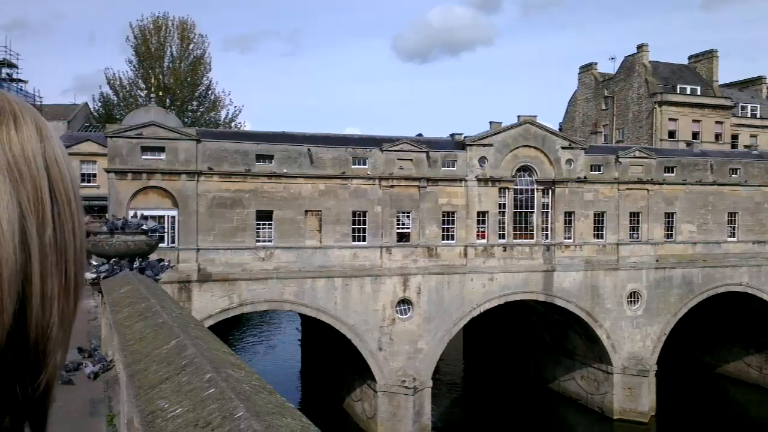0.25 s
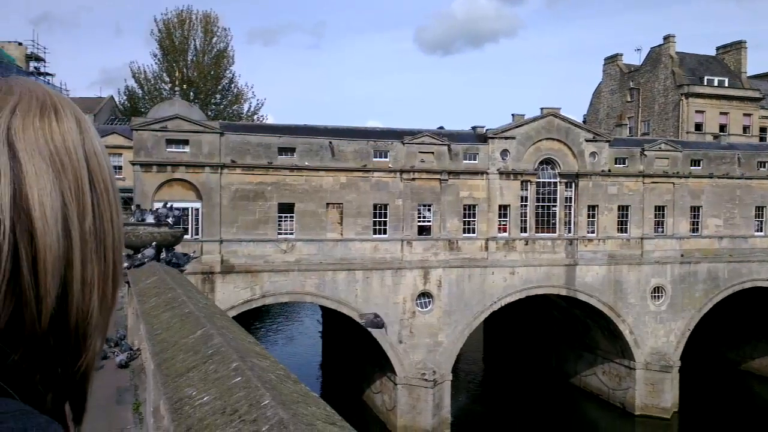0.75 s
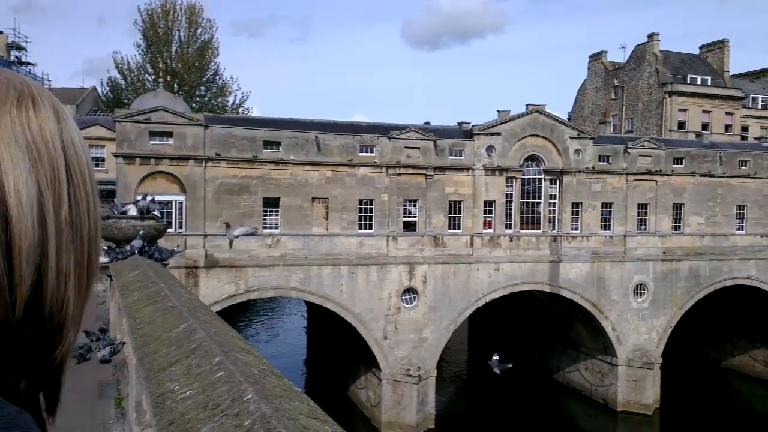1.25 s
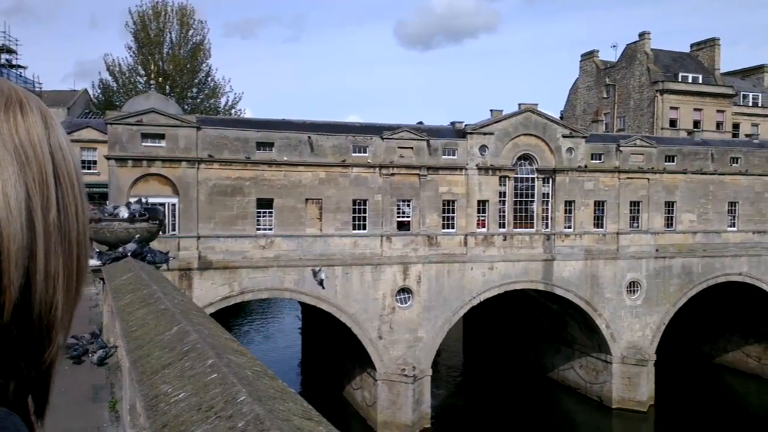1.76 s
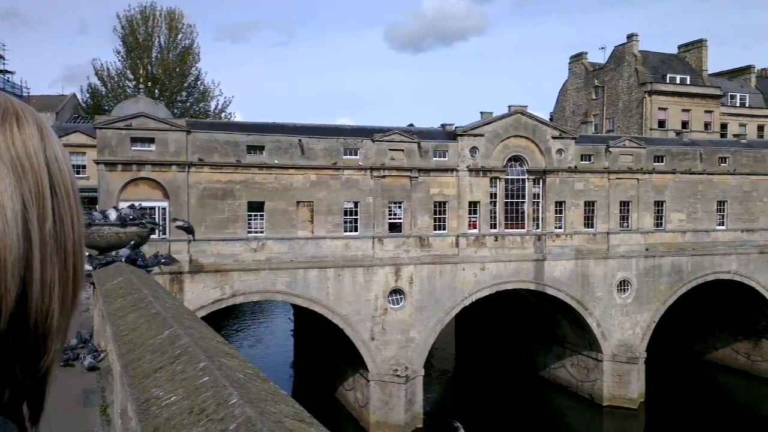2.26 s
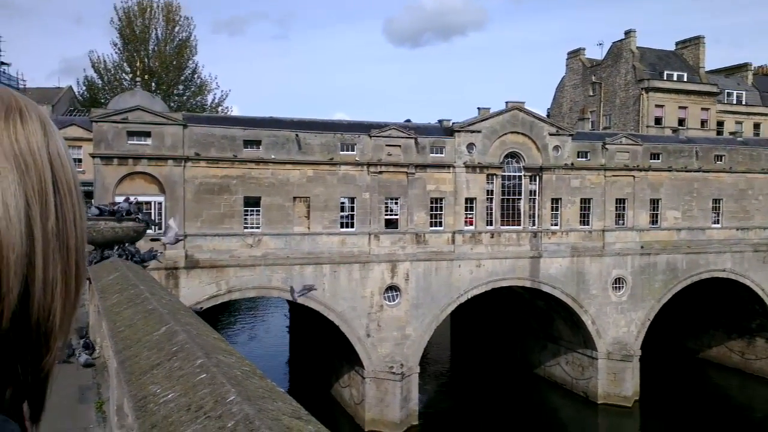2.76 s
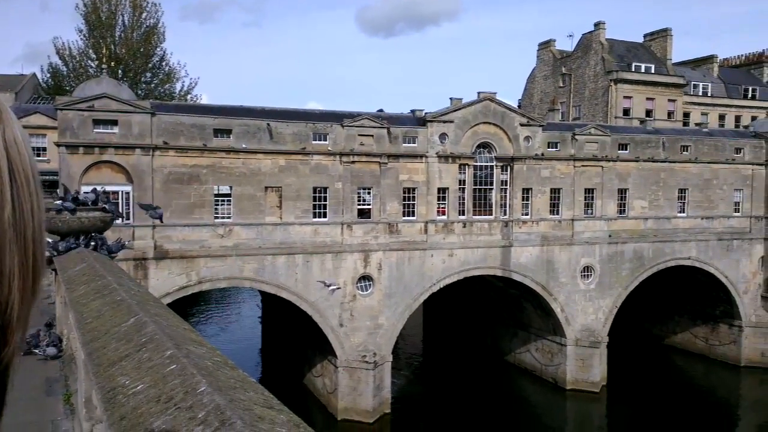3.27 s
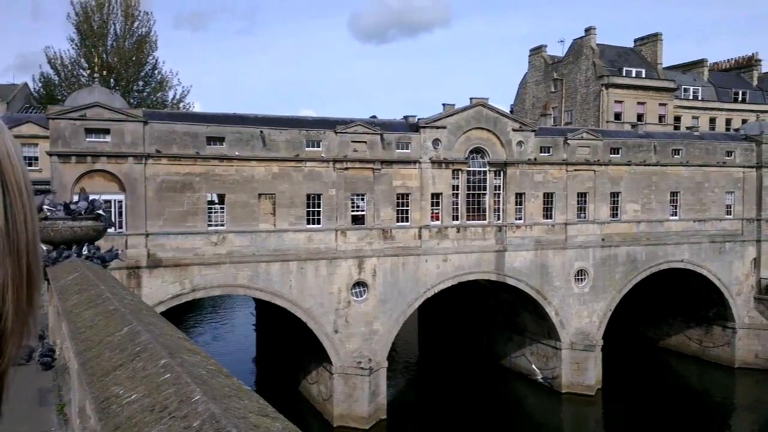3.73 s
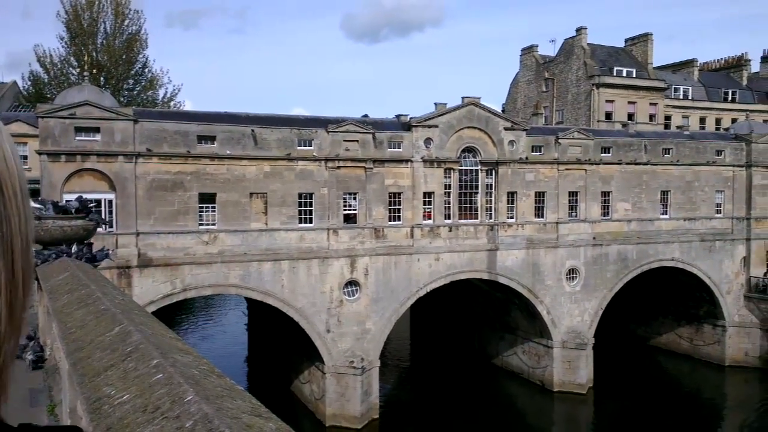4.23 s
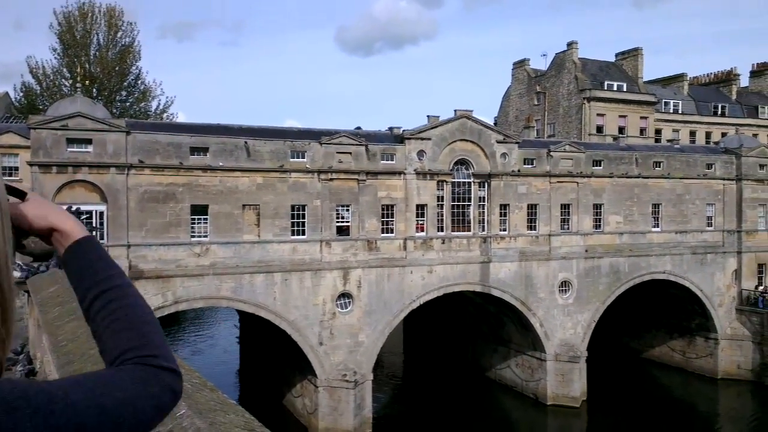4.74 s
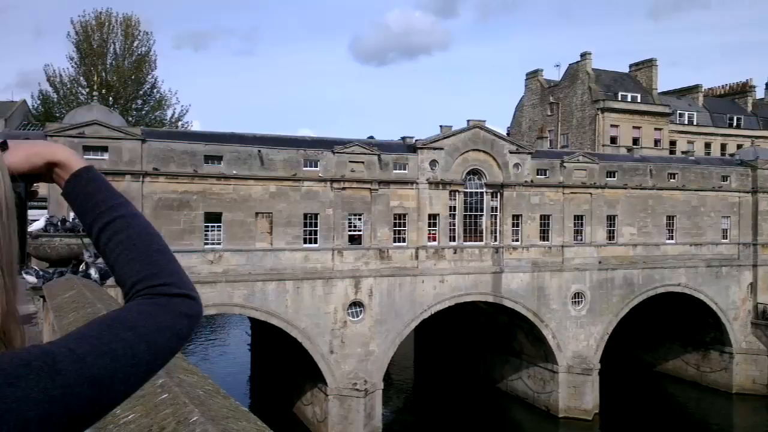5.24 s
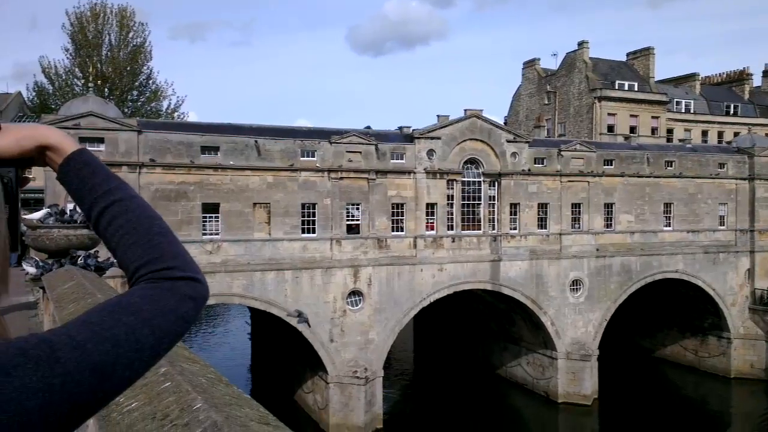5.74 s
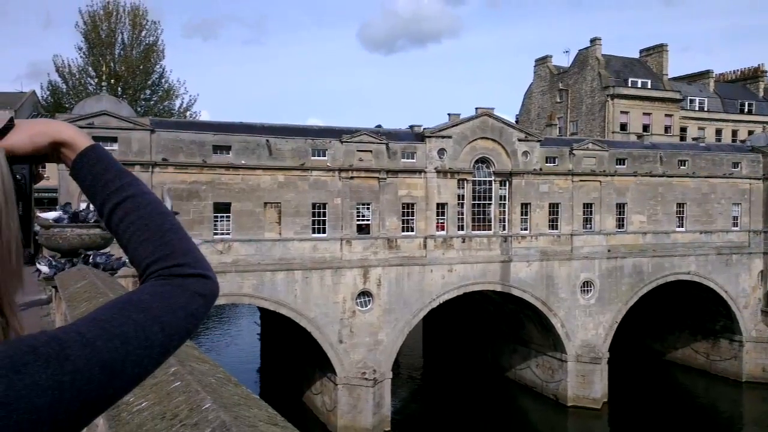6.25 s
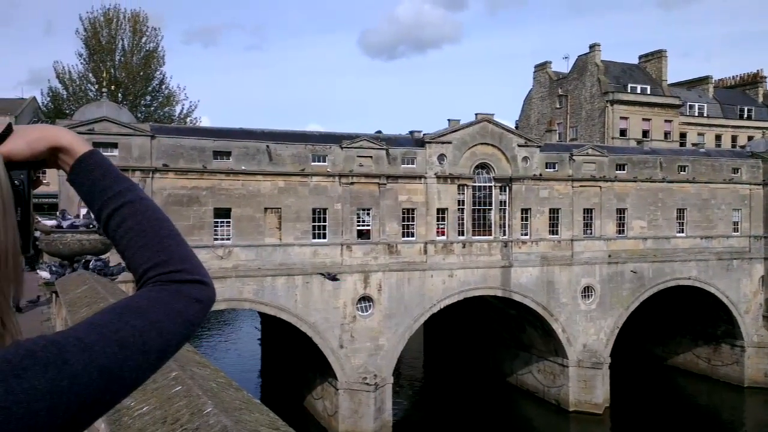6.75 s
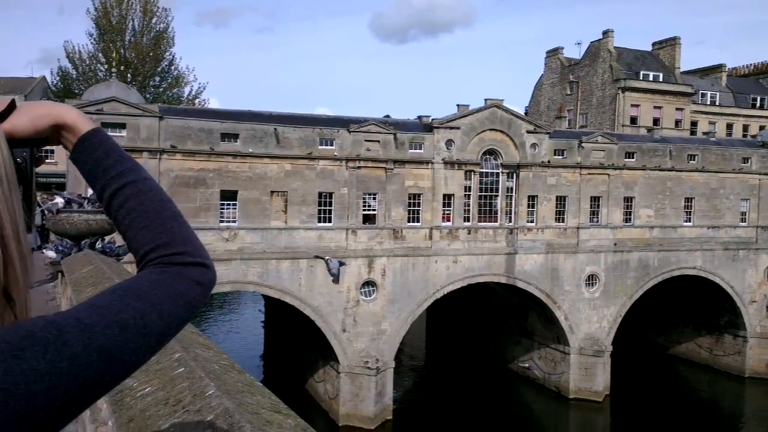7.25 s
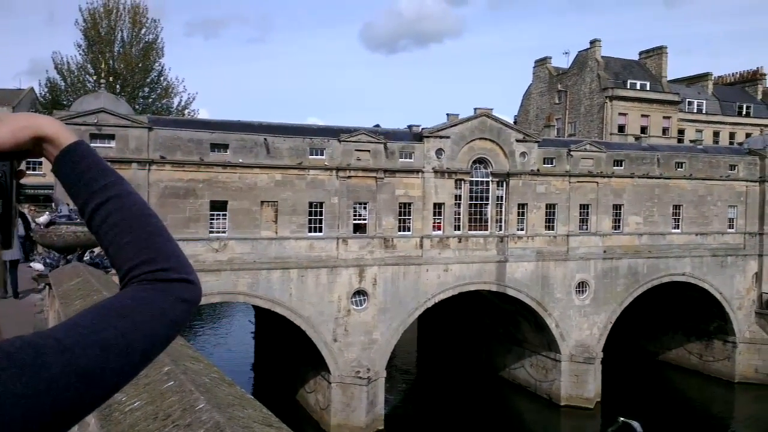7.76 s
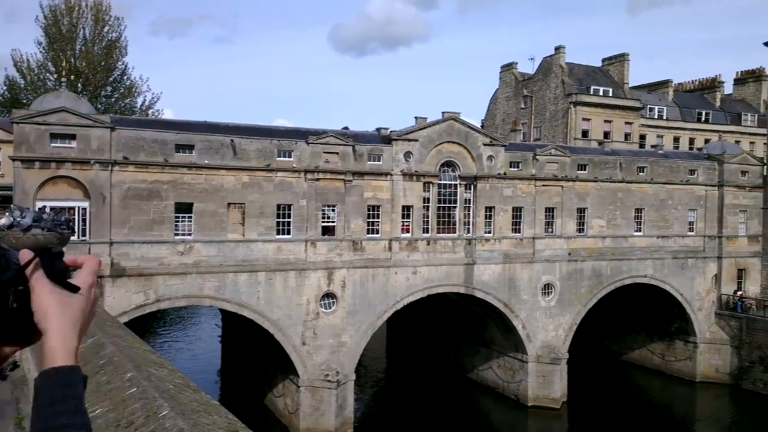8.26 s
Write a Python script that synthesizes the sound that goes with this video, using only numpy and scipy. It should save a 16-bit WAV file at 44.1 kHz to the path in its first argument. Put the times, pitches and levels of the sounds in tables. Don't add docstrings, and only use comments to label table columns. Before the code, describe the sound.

Constant rushing river water outdoors, with thin brake squeals, bursts of air release, dull distant thuds, and later sharp wing claps near the microphone.

```python
import sys
import numpy as np
from scipy import signal
from scipy.fft import rfft, irfft
from scipy.io import wavfile
from scipy.ndimage import uniform_filter1d

SR = 44100
rng = np.random.default_rng(int(sys.argv[2]) if len(sys.argv) > 2 else 0)


def natural_amplitude(level_db):
    exponent = np.asarray(level_db, float) / 20
    return 10 ** exponent


def generate_wav(sig):
    pcm = np.round(np.clip(np.atleast_2d(sig).T, -1, 1) * 32767).astype(np.int16)
    wavfile.write(sys.argv[1], SR, pcm)


N = 374661


def evened(x):
    return x / np.sqrt(np.mean(x ** 2) + 1e-20)


def read(points, hz):
    f, value = np.transpose(points)
    return np.interp(np.log(hz + 1), np.log(f + 1), value)


def add(mix, start_s, sound, pan_db):
    part = mix[:, round(start_s * SR):][:, :sound.shape[-1]]
    part += sound[..., :part.shape[1]] * natural_amplitude([[pan_db / 2], [-pan_db / 2]])


def resonate(x, hz, width_hz):
    return signal.lfilter(*signal.iirpeak(hz, hz / width_hz, SR), x)


def swell(t, start_s, length_s, rise_s, fall_s):
    opening = (t - start_s) / rise_s
    closing = (start_s + length_s - t) / fall_s
    return np.clip(np.minimum(opening, closing), 0, 1)


def drifting(noise, bins, frames):
    return evened(uniform_filter1d(uniform_filter1d(noise, size=bins, axis=0), size=frames, axis=1))


def pair(frames, hz, likeness):
    a, b, c, d = rng.standard_normal((frames, len(hz), 4)).T
    left, other = a + 1j * b, c + 1j * d
    same = likeness[:, None] / np.maximum(abs(likeness[:, None]), 1)
    right = same * left + np.sqrt(abs(1 - abs(same) ** 2)) * other
    return np.array([left, right])


def across(curves, hz):
    layer_hz = [600, 1400, 3000, 7500]
    place = np.interp(np.log(hz + 1), np.log(layer_hz), np.arange(len(curves)))
    share = np.clip(1 - abs(place[:, None] - np.arange(len(curves))), 0, 1)
    return share @ curves


def breeze(level_db=-86, lumpy_db=7):
    air, lumps = rng.standard_normal((2, 2, N))
    lumps = evened(uniform_filter1d(uniform_filter1d(lumps.sum(0), size=1800), size=1800))
    low = resonate(resonate(air * natural_amplitude(lumpy_db * lumps), 117, 110), 120, 200)
    return natural_amplitude(level_db) * evened(low + .5 * low[::-1])


def thud(db, t60_s):
    t = np.arange(int(.15 * SR)) / SR
    boom = evened(resonate(resonate(rng.standard_normal(len(t)), 960, 770), 860, 950))
    return natural_amplitude(db - 60 * t / t60_s) * boom * np.minimum(t / .003, 1)


def squeal(hz, grips, waver, rough, edge_s, drag_db):
    start_s = grips[0][0]
    length_s = sum(grips[-1][:2]) - start_s
    t = np.arange(start_s, start_s + length_s, 1 / SR)
    drift, flutter = uniform_filter1d(rng.standard_normal((SR, 2)), size=300, axis=0).T
    turns = np.cumsum(hz * (1 + waver * evened(drift)[:len(t)])) / SR
    tone = np.sqrt(2) * np.sin(2 * np.pi * turns) * (1 + rough * evened(flutter)[:len(t)])
    drag = (start_s, length_s, drag_db)
    press = [natural_amplitude(db) * swell(t, s, held_s, edge_s, edge_s) for s, held_s, db in grips + [drag]]
    return start_s, tone * np.max(press, axis=0)


def puff(start_s, length_s, db, dull_db_per_khz):
    # (frequency [Hz], density [dB per Hz])
    jet_colour = [(2350, -22), (4000, -3), (4740, -5.5), (7650, -1.5), (9060, 2), (9630, 2), (13800, -22),
                  (14900, -22), (15400, -36)]
    t = np.arange(max(start_s, 0), start_s + length_s, 1 / SR)
    hz = np.fft.rfftfreq(512, 1 / SR)
    frames = len(t) // 128 + 5
    shut = 1 - np.sin(np.linspace(0, np.pi, frames))
    over_khz = np.maximum(hz - 11500, 0) / 1000
    density_db = read(jet_colour, hz)[:, None] - dull_db_per_khz * np.outer(over_khz, 1 + 1.5 * shut)
    z = pair(frames, hz, .3 + 0 * hz) * natural_amplitude(density_db)
    hiss = evened(signal.istft(z, nperseg=512, noverlap=384)[1][:, :len(t)])
    flutter = evened(uniform_filter1d(rng.standard_normal(SR), size=1200))[:len(t)]
    sag_db_per_s, flutter_db = 13.5, 1.1
    pressure = natural_amplitude(db - sag_db_per_s * (t - start_s) + flutter_db * flutter)
    return t[0], hiss * pressure * swell(t, start_s, length_s, rise_s=0.091, fall_s=0.07)


def clap(rustle_s, bright_db_per_octave):
    # (frequency [Hz], width [Hz], level [dB])
    mic_peaks = [(3300, 1500, 1), (5400, 2500, -3), (8700, 2500, -3), (13800, 2500, -19)]
    t = np.arange(2600) / SR
    rustle = t / rustle_s * np.exp(-2 * t / rustle_s)
    echoes = 0.04 * np.exp(-t / .008)
    snap = rng.standard_normal(len(t)) * (rustle + echoes)
    snap[0] += 0.00014 / rustle_s
    rung = np.zeros(len(t))
    for k, (hz, width_hz, db) in enumerate(mic_peaks):
        sign = (-1) ** k
        gain = sign * natural_amplitude(db + bright_db_per_octave * np.log2(hz / 8800))
        rung += gain * resonate(resonate(snap, hz, width_hz), hz, 2 * width_hz)
    return rung / abs(rung).max()


def droplets(per_s=500, level_db=-55):
    falls = rng.random((2, N)) < per_s / SR
    size = natural_amplitude(11.0 * np.minimum(rng.exponential(1, (2, N)), 4)) * falls
    ticks = size * rng.choice([-1, 1], (2, N))
    return natural_amplitude(level_db) * evened(resonate(resonate(ticks, 7700, 3500), 8000, 4400))


def weir_surge(t, hz, facing):
    # (time [s], level [dB])
    river_flow = [(0.0, -30.5), (0.35, -33.5), (1.05, -33.5), (1.4, -34), (1.9, -35), (2.5, -32),
                  (3.14, -30), (3.35, -32.5), (4.2, -32.5), (4.9, -32), (5.7, -32.5), (6.1, -32),
                  (6.64, -32), (7.05, -31), (7.2, -31), (7.5, -29), (8.0, -29), (8.49, -29)]
    # (usual level [dB], share of flow [0-1], gain by the turn [dB])
    layer_lift = [(2.5, 0.47, -1.6), (3, 0.69, -1.93), (1, 0.85, 1), (2, 0.82, 1)]
    # (time [s], length [s], level [dB], centre [Hz])
    heaves = [(1.344, .1, 3, 600), (1.575, 0.16, 5, 700), (3.057, 0.27, 2.5, 1500), (3.766, 0.11, -5, 1190),
              (4.19, .1, 2, 3000), (5.577, .07, -6, 1500), (6.992, 0.22, 3, 1800), (5.154, 0.071, 3.5, 800),
              (6.045, 0.17, 1.5, 800), (2.05, 0.16, 1, 1400), (3.972, 0.14, 2.5, 800),
              (7.39, 0.12, 2, 3500), (7.723, 0.19, 3, 1200), (8.197, 0.055, 3.5, 1500)]
    flow_db = np.interp(t, *np.transpose(river_flow)) + 33
    surge_db = across(np.array(layer_lift) @ [t ** 0, flow_db, facing], hz)
    for s, length_s, db, centre_hz in heaves:
        region = np.exp(-(np.log2((hz + 1) / centre_hz) / 0.86) ** 2)
        moment = np.exp(-(2 * (t - s) / length_s) ** 2)
        surge_db += db * np.outer(region, moment)
    return surge_db


def weir(level_db=-9.5, patchy_db=0.5, slosh_db=0.3, flicker_db=1.13, mist_db=2.2):
    # (frequency [Hz], density [dB per Hz])
    open_colour = [(290, -6.5), (470, -1.5), (900, 4), (1150, 2), (1700, 2.5), (2050, -1.5), (2500, -5),
                   (3000, -1), (3500, 0.5), (3800, -2.5), (4400, -15), (7500, -19.5), (9600, -16.5),
                   (12500, -42.5)]
    # (frequency [Hz], density [dB per Hz])
    shaded_colour = [(290, -4), (470, 0.5), (900, 0), (1150, 1.5), (1700, -10.5), (2050, -14.5),
                     (2500, 4.5), (3000, 2.5), (3500, -8), (3800, -9.5), (4400, -6.5), (7500, -8),
                     (9600, -6), (12500, -26)]
    # (time [s], share of shaded colour [0-1])
    parapet = [(0, 0.5), (0.98, 0.41), (1.15, 0.18), (2.4, 0.19), (2.8, 0.12)]
    # (time [s], share of the turn [0-1])
    camera_turn = [(0, .3), (.6, 0.05), (2.45, 0.05), (2.9, 0.85), (3.6, 0.98), (6.55, 0.65), (6.9, 1.1),
                   (8.5, 0.9)]
    # (left over right [dB], added by the turn [dB], added by the shade [dB])
    layer_lean = [(3, -0.5, -5), (10, -4.5, -25.5), (2, -5, 0.5), (4.5, -1, 0.5)]
    # (frequency [Hz], in phase [-1 to 1], a quarter cycle apart [-1 to 1])
    port_likeness = [(215, 0.66, 0.1), (473, 0.89, -0.13), (885, 0.6, 0.26), (985, -0.11, 0.21),
                     (1520, -0.011, -0.12), (1820, 0.42, -0.56), (2300, 0.5, -0.1), (2800, 0.49, -0.024),
                     (3410, 0.8, -0.12), (3880, 0.16, 0.11), (4370, 0.55, -0.12), (5300, 0.28, -0.03),
                     (7800, 0.38, 0.0042), (10000, 0.31, 0.02)]
    frames, hz = N // 256 + 5, np.fft.rfftfreq(1024, 1 / SR)
    t = np.arange(frames) * 256 / SR
    facing = np.interp(t, *np.transpose(camera_turn))
    shade = np.clip(np.interp(t, *np.transpose(parapet)), 0, 1)
    surge_db = weir_surge(t, hz, facing)
    pan_db = across(np.array(layer_lean) @ [t ** 0, facing, shade], hz)
    patches, sloshes, flicker = rng.standard_normal((frames, len(hz), 3)).T
    patches = drifting(patches, 14, 10)
    sloshes = drifting(sloshes, 60, 18)
    flicker = drifting(flicker, 120, 3)
    density_db = np.outer(read(open_colour, hz), 1 - shade) + np.outer(read(shaded_colour, hz) - 1.5, shade)
    density_db -= np.maximum(hz - 12600, 0)[:, None] * 0.0035
    gusts = sloshes[-100] + flicker[-100]
    density_db += mist_db * np.clip((hz[:, None] - 9500) / 2500, 0, 1) * gusts
    density_db += level_db - 38 + surge_db
    density_db += patchy_db * patches + slosh_db * sloshes + flicker_db * flicker
    f, in_phase, quarter = np.transpose(port_likeness)
    likeness = read(np.c_[f, in_phase], hz) + 1j * read(np.c_[f, quarter], hz)
    z = pair(frames, hz, likeness) * natural_amplitude([density_db + pan_db / 2, density_db - pan_db / 2])
    return signal.istft(z, nperseg=1024, noverlap=768)[1][:, :N]


def scene():
    # (time [s], level [dB], T60 [s])
    blows = [(1.478, -27, 0.14), (1.565, -21, 0.12), (1.602, -29, 0.19), (1.622, -27.5, 0.21),
             (1.832, -27, 0.063), (1.966, -28, 0.25), (2.044, -29, .1), (2.14, -28, 0.1),
             (2.79, -21.5, 0.075)]
    # (time [s], length [s], frequency [Hz], level [dB], left over right [dB])
    short_tones = [
        (.29, .1, 13420, -63, 10),
        (2.139, 0.03, 7740, -46, 0),
        (3.777, .022, 7900, -54, 10),
        (3.809, 0.02, 8100, -45, 2),
    ]
    # (time [s], length [s], level [dB])
    high_grips = [(0, 0.062, -38.5), (.11, 0.08, -39), (.205, 0.044, -38), (.29, 0.084, -42)]
    # (time [s], length [s], level [dB])
    low_grips = [(2.87, .3, -37), (2.95, .15, -30), (3.125, .08, -30), (3.17, .11, -38), (3.32, .07, -40),
                 (3.41, .11, -41), (3.58, .07, -44)]
    # (time [s], length [s], level [dB], treble loss above 11.5 kHz [dB per kHz])
    air_puffs = [
        (-.08, 0.4, -36.5, -1),
        (1.14, 0.49, -31.5, -1.5),
        (1.29, 0.087, -27.5, 3),
        (3.11, 0.11, -40, 10),
        (8.38, 0.27, -36, 9),
    ]
    # (time [s], peak [dB], left over right [dB], rustle [s], brightness [dB per octave])
    wing_claps = [(3.2353, -25, 4, .0005, 5), (3.932, -32, 2, .0005, 2), (5.0304, -33, 1, .0003, 5),
                  (5.724, -29, -1, .001, -1), (5.998, -33, 5, .015, 0), (6.6304, -36, 0, .0005, 4),
                  (7.1047, -14, -4, .0003, 6), (7.4431, -13, -3, .0002, 0), (7.613, -22, 2, .007, 1),
                  (7.672, -26, 1, .005, -5), (8.0, -25, 1, .002, 6), (8.05, -30, 2, .002, 0),
                  (8.3474, -15, -3, .0003, 0), (8.35, -25, -2, .004, -1)]
    mix = weir() + droplets()
    for s, db, t60_s in blows:
        add(mix, s, thud(db, t60_s), pan_db=3.0)
    for s, length_s, hz, db, pan_db in short_tones:
        tick = squeal(hz, [(s, length_s, db)], waver=.001, rough=0.076, edge_s=.002, drag_db=db)
        add(mix, *tick, pan_db)
    high = squeal(9410, high_grips, waver=.003, rough=.3, edge_s=.015, drag_db=-48)
    add(mix, *high, pan_db=9)
    low = squeal(1282, low_grips, waver=.0006, rough=.2, edge_s=.03, drag_db=-46)
    add(mix, *low, pan_db=-5)
    for row in air_puffs:
        add(mix, *puff(*row), pan_db=8.5)
    for s, db, pan_db, rustle_s, bright_db_per_octave in wing_claps:
        add(mix, s, natural_amplitude(db) * clap(rustle_s, bright_db_per_octave), pan_db)
    return mix


def low_pass(x):
    return signal.sosfilt(signal.butter(12, 15530, fs=SR, output="sos"), x)


def record(dry):
    bass_cut = signal.butter(6, 270, "high", fs=SR, output="sos")
    roll_off = signal.butter(4, 12500, fs=SR, output="sos")
    left, right = signal.sosfilt(np.vstack([bass_cut, roll_off]), dry)
    hz = np.fft.rfftfreq(N, 1 / SR)
    echo_gain, echo_s = .55, .002007
    echo = 1 + echo_gain * np.exp(-2j * np.pi * hz * echo_s)
    mono_bass = 1 / np.sqrt(1 + (400 / (hz + 1)) ** 8)
    mid = (left + right) / 2
    side = irfft(rfft((left - right) / 2) * echo * mono_bass, N)
    return low_pass(np.array([mid + side, mid - side]) + breeze())


dry = scene()
out = record(dry)
generate_wav(out)
```